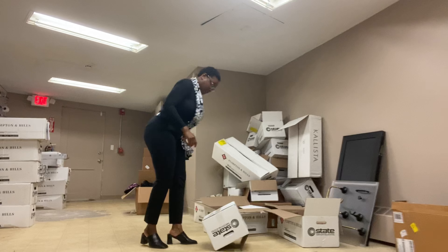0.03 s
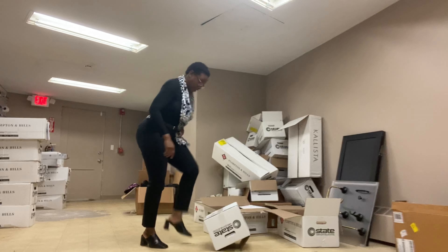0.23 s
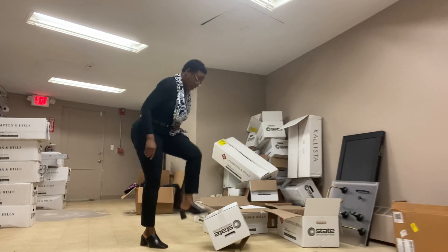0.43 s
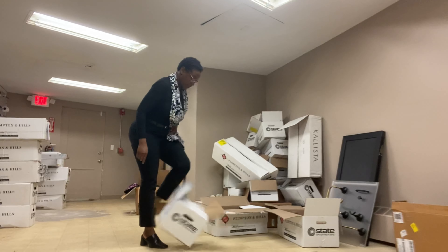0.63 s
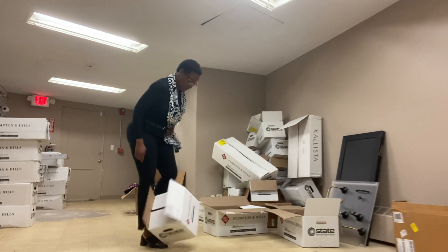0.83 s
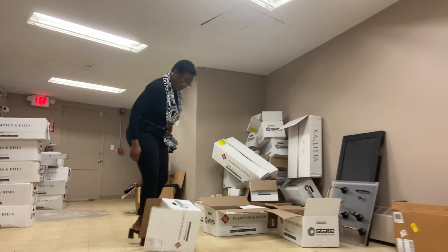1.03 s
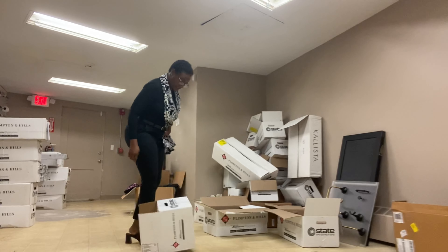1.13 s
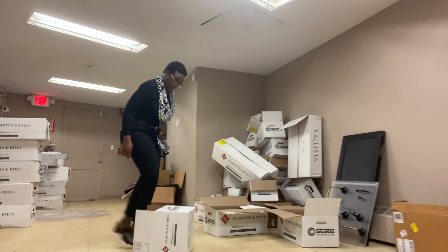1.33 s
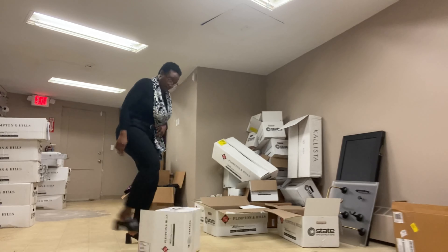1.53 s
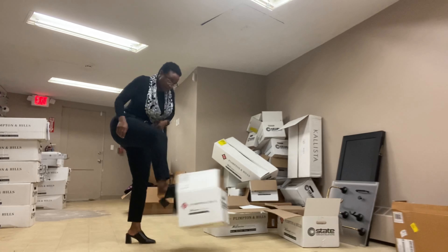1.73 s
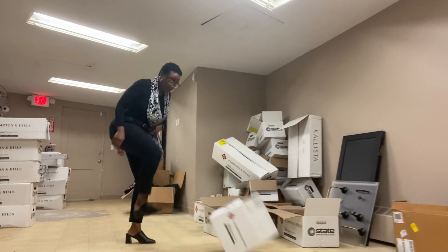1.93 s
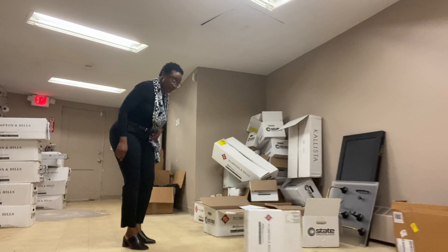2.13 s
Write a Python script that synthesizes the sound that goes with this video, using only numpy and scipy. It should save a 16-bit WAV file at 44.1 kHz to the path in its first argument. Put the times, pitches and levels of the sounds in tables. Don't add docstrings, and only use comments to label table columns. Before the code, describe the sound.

Hollow cardboard box knocks, slaps and scrapes along a hard floor after kicks in a bare room

```python
import sys
import numpy as np
from scipy import signal
from scipy.fft import rfft, irfft, next_fast_len
from scipy.io import wavfile
from scipy.ndimage import uniform_filter1d

SR = 44100
rng = np.random.default_rng(int(sys.argv[2]) if len(sys.argv) > 2 else 0)


def makeup_ratio(level_db):
    decades = np.asarray(level_db, float) / 20
    return 10 ** decades


def file_out(sig):
    cols = np.atleast_2d(sig).T
    lim = np.clip(cols, -1, 1)
    pcm = np.round(lim * 32767).astype(np.int16)
    wavfile.write(sys.argv[1], SR, pcm)


N = 96446
LEAD_S = 0.1
CONTACT_S = 0.02

# (frequency [Hz], level [dB], t60 [s])
AIR_MODES = [(46.6, -5.5, 0.21), (89, -9.5, 0.36), (121, 1.5, 0.076), (149, -2.5, 0.144),
             (176.2, -1, 0.044), (240, -2, 0.097), (291, 2.5, 0.13)]
# (frequency [Hz], level [dB], t60 [s])
PANEL_MODES = [(340, -1, 0.024), (368, -2, 0.083), (468, 1.5, 0.035), (583, -10.5, 0.024),
               (660, -0.5, 0.064), (730, -5.5, 0.064), (800, -9, 0.15), (975, -3, 0.058),
               (1106, -7.5, 0.049), (1261, -22.5, 0.3), (1600, -14, 0.016), (1900, -17, 0.014),
               (2034, -19.5, 0.042)]
# (frequency [Hz], level [dB])
CARD_SPECTRUM = [(500, -1), (1300, 9), (2300, -1.5), (4000, -1.5), (8000, -5.5), (12500, -7), (14300, -22),
                 (15300, -60)]


def unit(x):
    return x / np.max(np.abs(x))


def curve(hz, table, column=1):
    table = np.array(table)
    return np.interp(np.log(hz + 1), np.log(table[:, 0]), table[:, column])


def colour(x, spectrum):
    n = x.shape[-1]
    f = np.arange(n // 2 + 1) * SR / n
    return irfft(rfft(x) * makeup_ratio(curve(f, spectrum)), n)


def fade(t, t60):
    return np.exp(-np.log(1000) * np.maximum(t, 0) / t60) * (t >= 0)


def add(track, time_s, sound):
    i = int(round((time_s + LEAD_S) * SR))
    n = min(len(sound), len(track) - i)
    track[i:i + n] += sound[:n]


def ring(modes, size, scatter_db=0, detune=0):
    t = np.arange(size) / SR
    chance = rng.standard_normal((len(modes), 2))
    response = np.zeros(size)
    for (hz, db, t60), (c, d) in zip(modes, chance):
        tone = np.sin(2 * np.pi * hz * (1 + detune * d) * t)
        response += makeup_ratio(db + scatter_db * c) * tone * fade(t, t60)
    return response


def sagging_sine(hz, t, sag):
    return np.sin(2 * np.pi * hz * np.cumsum(1 + sag * (np.exp(-t / CONTACT_S) - 0.5)) / SR)


def blow(ring_hz, thump_db, crack_db):
    # (frequency [Hz], level [dB])
    slap_spectrum = [(150, 7), (400, -4.5), (800, -1), (1300, -0.5), (1700, -30.5), (3000, -23.5),
                     (6000, -22.5)]
    detune, scatter_db = 0.049, 2
    size = SR // 3
    t = np.arange(size) / SR
    rise = 1 - np.exp(-t / 0.0009)

    def focus(modes):
        return [(hz, db - 4 * abs(np.log2(hz / ring_hz)), *rest) for hz, db, *rest in modes]

    contact = (t == 0) + makeup_ratio(-19.5) * rng.standard_normal(size) * np.exp(-t / CONTACT_S)

    def struck(modes, spread):
        return unit(signal.fftconvolve(contact, ring(modes, size, scatter_db, spread))[:size])

    own = sagging_sine(ring_hz, t, 0.08) * fade(t, 0.042) * rise
    panels = struck(focus(PANEL_MODES), detune)
    flaps = 1 + np.repeat(rng.exponential(size=size // 170 + 1), 170)[:size]
    slap = colour(rng.standard_normal(size) * flaps, focus(slap_spectrum))
    slap = unit(slap * fade(t, 0.13) * rise)
    thump = struck(AIR_MODES, detune / 2) * (1 - np.exp(-t / 0.018))
    crack = colour(rng.standard_normal(size) * flaps, CARD_SPECTRUM)
    crack = unit(crack * (fade(t, 0.09) + makeup_ratio(2.5) * fade(t, 0.39)))
    return (makeup_ratio(-2) * own + makeup_ratio(-3) * panels + makeup_ratio(-5.5) * slap
            + makeup_ratio(thump_db - 7.5) * thump + makeup_ratio(crack_db + 8.5) * crack)


def note(hz, t60):
    t = np.arange(SR // 4) / SR
    swell = 1 - np.exp(-t * hz / 0.88)
    return unit(sagging_sine(hz, t, 0.088) * swell * fade(t, t60))


def tumble(size):
    # (time [s], rattle level [dB], scuff level [dB])
    motion = [(0.449, -28.5, -56), (0.522, -21.5, -62), (0.624, -24, -60), (0.642, -19, -61),
              (0.672, -27, -62), (0.798, -33.5, -49), (0.952, -43, -53), (1.078, -33, -61),
              (1.205, -53, -55), (1.368, -24.5, -51), (1.518, -31.5, -52.5), (1.59, -19.5, -44),
              (1.678, -35, -64), (1.808, -55, -65), (2.016, -39, -93), (2.142, -19, -30.5),
              (2.187, -21, -44)]
    rattle_per_s = 650
    t = np.arange(size) / SR - LEAD_S
    times, rattle_db, scuff_db = np.array(motion).T
    moving = np.clip((t - times[0]) / 0.0083, 0, 1)
    hit = rng.random(size) < rattle_per_s / SR
    knocks = hit * rng.standard_normal(size) * makeup_ratio(3 * rng.exponential(size=size))
    panels = signal.fftconvolve(knocks, ring(PANEL_MODES, SR // 3))[:size]
    hollow = signal.fftconvolve(knocks, ring(AIR_MODES, SR // 3))[:size]
    grit = 1 + 0.5 * uniform_filter1d(np.abs(knocks), 90) / np.mean(np.abs(knocks))
    scuff = colour(rng.standard_normal(size) * grit, CARD_SPECTRUM)
    panels, hollow, scuff = (p / np.std(p) for p in (panels, hollow, scuff))
    rattle = makeup_ratio(np.interp(t, times, rattle_db) - 7) * (panels + makeup_ratio(3.5) * hollow)
    scuff_gain = makeup_ratio(np.interp(t, times, scuff_db) - 1) + sliding(t)
    return moving * (rattle + scuff_gain * scuff)


def sliding(t):
    # (start [s], length [s], level [dB], rising share of the length)
    slides = [(0.467, 0.067, -39.5, 0.14), (0.57, 0.053, -32, 0.066), (1.59, 0.1, -34, .1),
              (2.027, 0.044, -33, .1), (0.49, 0.074, -31, 1), (0.679, 0.014, -33.5, 0.23),
              (0.803, 0.065, -51.5, 0.27), (1.215, 0.16, -59, 0.38), (1.417, 0.079, -49.5, 0.25),
              (1.66, 0.13, -36.5, 0.58), (2.076, 0.069, -51, 0.15), (2.16, 0.1, -31, 0.5)]
    gain = np.zeros(len(t))
    for start, length, db, share in slides:
        peak = start + length * np.clip(share, 0.05, 0.95)
        gain += makeup_ratio(db) * np.interp(t, [start, peak, start + length], [0, 1, 0])
    return gain


def lows_late(x):
    late_cycles, late_from_hz, rumble_cut_hz = 2.607, 89.2, 82
    size = next_fast_len(len(x) + SR)
    f = np.arange(size // 2 + 1) * SR / size
    delay = np.exp(-2j * np.pi * late_cycles * np.log(1 + f / late_from_hz))
    radiation = 1 / np.sqrt(1 + (rumble_cut_hz / (f + 1)) ** 6)
    return irfft(rfft(x, size) * delay * radiation, size)[:len(x)]


def tick(hz, t60):
    t = np.arange(SR // 8) / SR
    band_hz = [hz / 1.5, min(hz * 1.5, 15000)]
    sos = signal.butter(2, band_hz, "band", fs=SR, output="sos")
    chatter = makeup_ratio(-17.5) * rng.standard_normal(len(t)) * fade(t, t60)
    return unit(signal.sosfilt(sos, (t == 0) + chatter))


def pair(size):
    same = rfft(rng.standard_normal(size))
    own = rfft(rng.standard_normal((2, size)))
    share = 1 / (1 + (np.arange(len(same)) * SR / size / 180) ** 2)
    return irfft(np.sqrt(share) * same + np.sqrt(1 - share) * own, size)


def echoes():
    # (frequency [Hz], t60 [s], level [dB])
    reverb = [(61, 1, 3.5), (156, 0.41, -7), (300, 0.32, 1), (510, 0.44, 0), (1110, 0.66, -4),
              (2820, 0.6, -0.5), (9300, 0.51, -2.5), (13820, 0.86, -9.5)]
    size = SR * 2 // 3
    t = np.arange(size) / SR
    f, frame_s, z = signal.stft(pair(size), SR, nperseg=512)
    t60 = np.maximum(curve(f, reverb), 0.1)[:, None]
    level_db = curve(f, reverb, column=2)[:, None]
    z = z * makeup_ratio(level_db - 60 * frame_s / t60) * np.sqrt(2 * np.log(1000) / t60 / SR)
    tail = signal.istft(z, SR, nperseg=512)[1][:, :size] * (1 - np.exp(-t / 0.0034))
    early = pair(size) * fade(t, 0.042) * (t > 0.001)
    early = early / np.sqrt(np.sum(early ** 2, axis=1, keepdims=True))
    sideways = 1.33 * (early - early[::-1])
    return tail + makeup_ratio(-9.5) * (early + sideways)


def room(x):
    place = np.arange(len(x)) / SR / 0.12
    wet = np.zeros((2, len(x)))
    for k in range(int(place[-1]) + 2):
        share = np.cos(np.pi / 2 * np.clip(place - k, -1, 1))
        wet += signal.fftconvolve((x * share)[None], echoes(), axes=1)[:, :len(x)]
    return x + wet


def quiet():
    # (frequency [Hz], level [dB])
    hum = [(59.5, -67), (120, -80), (240, -77)]
    # (frequency [Hz], density [dB/Hz])
    air_spectrum = [(30, -16), (62, -3), (100, -17), (260, -16), (524, -29), (1090, -29), (7000, -29),
                    (14000, -34)]
    t = np.arange(N) / SR
    air = colour(pair(N), air_spectrum)
    lamps = sum(makeup_ratio(db) * np.sqrt(2) * np.sin(2 * np.pi * hz * t) for hz, db in hum)
    return air / np.std(air) * makeup_ratio(-61.5) + lamps


def scene():
    # (time [s], level [dB], panel ring [Hz], thump [dB], crack [dB])
    earlier = [
        (-.06, -17.5, 340, 11.5, -13),
        (-.012, -37, 272, 14.5, -35),
    ]
    # (time [s], level [dB], panel ring [Hz], thump re level [dB], crack re level [dB])
    blows = [(0.473, -10, 347, -20, -15), (0.579, -1, 422, -3, -23), (0.697, -11, 270, 11, -20.5),
             (0.769, -22, 285, 19, -36), (0.865, -39, 291, 6, -23), (0.968, -8.5, 788, -11, -21),
             (1.017, -16.5, 735, 6, -27), (1.085, -15, 490, 4.5, -25), (1.146, -30, 296, 13, -12.5),
             (1.241, -36, 308, 23, -9.5), (1.292, -25, 323, 3, -30), (1.345, -13.5, 290, 12, -21.5),
             (1.41, -20, 268, 6, -22), (1.544, -32, 283, 7, -16), (1.588, -5.5, 594, -33, -20),
             (1.609, -4.5, 291, -13, -36), (1.695, -13.5, 360, 12, -30), (1.739, -10, 356, 0.5, -29),
             (1.789, -22.5, 294, -16, -26.5), (1.837, -35, 250, -33, -21.5), (1.956, -2.5, 447, 3, -25),
             (2.025, -4.5, 396, -1.5, -16.5), (2.094, -9.5, 617, -37, -14.5), (2.164, -25, 268, -28, -3.5)]
    # (time [s], level [dB], centre [Hz], t60 [s])
    ticks = [(0.099, -27.5, 990, 0.24), (.097, -29, 2010, 0.037), (.456, -43, 630, 0.098),
             (0.579, -16.5, 2870, 0.049), (.866, -30.5, 10700, 0.01), (0.971, -12.5, 1200, 0.024),
             (1.149, -26.5, 1460, 0.093), (1.346, -25, 1450, 0.013), (1.545, -27.5, 11100, 0.014),
             (1.588, -17.5, 2600, 0.1), (1.96, -35, 2190, 0.027), (2.026, -9, 11100, 0.017),
             (2.027, -33, 2100, 0.025), (2.098, -27, 1600, 0.0062), (2.101, -14, 1100, 0.0055),
             (2.119, -17, 1220, 0.017)]
    # (time [s], level [dB], frequency [Hz], t60 [s])
    notes = [(-.01, -22.5, 133.6, 0.14), (.005, -30.5, 339, .12), (.471, -13.5, 702, 0.018),
             (.472, -20.5, 1430, 0.018), (.484, -20, 143, 0.061), (.578, -7.5, 679, 0.045),
             (.59, -7, 148, 0.063), (.6, -10, 312, 0.038), (.625, -18, 138, 0.13), (.69, -17.5, 171, 0.026),
             (.705, -16.5, 125, 0.065), (.728, -18, 85, 0.033), (.765, -24, 137, 0.13),
             (.768, -22.5, 293, 0.12), (.78, -29.5, 712, 0.083), (.8, -22, 288.7, 0.19),
             (.826, -22.5, 136, 0.15), (.86, -23, 132, .08), (.892, -41, 135, 0.055),
             (.945, -23.5, 145, 0.18), (.968, -16.5, 440, 0.043), (.972, -20, 792, 0.11),
             (.997, -13, 135, 0.046), (1.025, -18, 143, 0.027), (1.022, -22.5, 354, 0.039),
             (1.065, -22, 142, 0.093), (1.083, -26, 800, .05), (1.096, -20, 145.4, 0.15),
             (1.098, -23, 265, 0.051), (1.155, -22.5, 134, 0.044), (1.343, -24.5, 728, 0.061),
             (1.355, -19.5, 224, 0.08), (1.405, -19, 155, 0.18), (1.43, -19, 141.2, 0.29),
             (1.44, -25.5, 682, 0.076), (1.465, -29, 297, 0.07), (1.495, -28, 144, 0.11),
             (1.545, -23, 89, 0.19), (1.59, -10.5, 643, 0.061), (1.606, -11, 144.5, 0.058),
             (1.655, -19.5, 136, 0.1), (1.685, -19, 142, .08), (1.72, -20, 142, 0.053),
             (1.775, -21.5, 135, 0.076), (1.957, -22.5, 995, 0.08), (1.965, -11, 152, 0.071),
             (2.03, -7.5, 167, 0.057), (2.05, -9.5, 149, 0.073), (2.1, -21, 964, .06),
             (2.158, -14, 154, 0.081)]
    lead = int(LEAD_S * SR)
    box = tumble(N + lead)
    for time_s, db, ring_hz, thump_db, crack_db in list(earlier) + list(blows):
        add(box, time_s, makeup_ratio(db) * blow(ring_hz, thump_db, crack_db))
    box = lows_late(box)
    for time_s, db, hz, t60 in ticks:
        add(box, time_s, makeup_ratio(db) * tick(hz, t60))
    for time_s, db, hz, t60 in notes:
        add(box, time_s, makeup_ratio(db) * note(hz, t60))
    return room(box)[:, lead:] + quiet()


def low_pass(x):
    return signal.sosfilt(signal.butter(12, 15730, fs=SR, output="sos"), x)


def record(dry):
    # (frequency [Hz], left minus right [dB])
    left_over_right = [(60, 1.5), (125, -2), (250, 7.5), (500, 4.5), (1000, 0), (4000, 1)]
    port_hz, port_lag_s, body_lead_s, knee = 5500, 1 / 5250, 0.00003, 1.05
    f = np.arange(N // 2 + 1) * SR / N
    left, right = rfft(dry)
    high = 1 / (1 + (port_hz / (f + 1)) ** 8)
    tilt = makeup_ratio(curve(f, left_over_right) / 2)
    body = np.sqrt(1 - high) * right * np.exp(2j * np.pi * f * body_lead_s)
    port = np.sqrt(high) * left * np.exp(-2j * np.pi * f * port_lag_s)
    x = irfft(np.array([left * tilt, (body - port) / tilt]), N)
    return low_pass(np.tanh(knee * x) / knee)


dry = scene()
out = record(dry)
file_out(out)
```